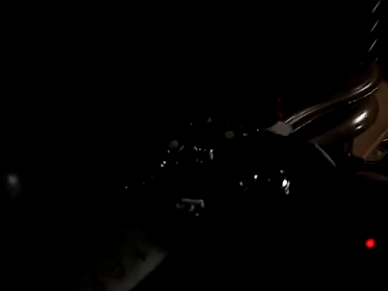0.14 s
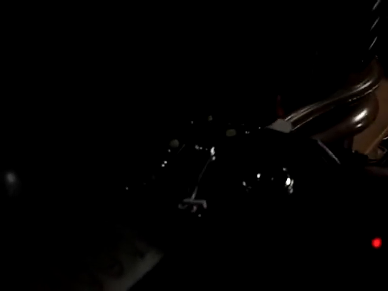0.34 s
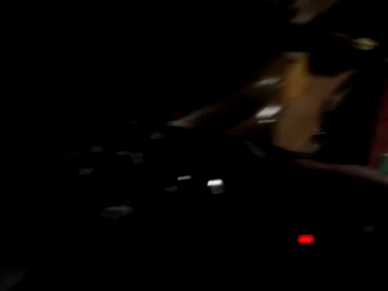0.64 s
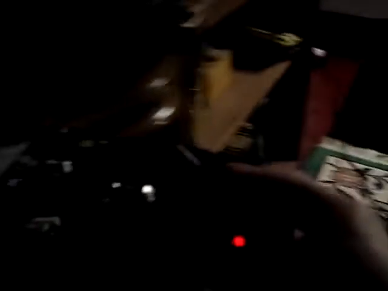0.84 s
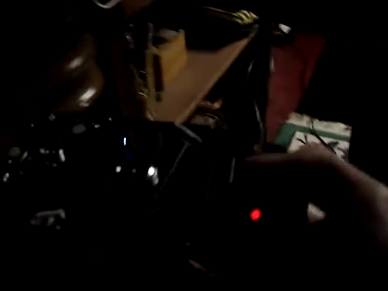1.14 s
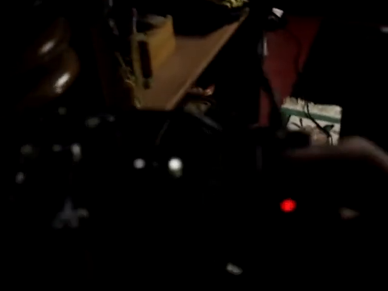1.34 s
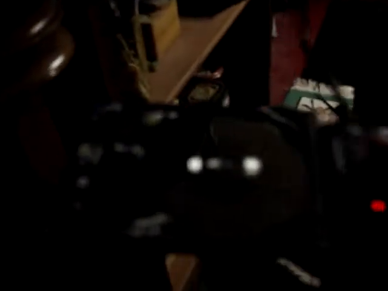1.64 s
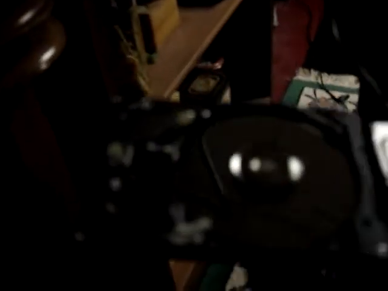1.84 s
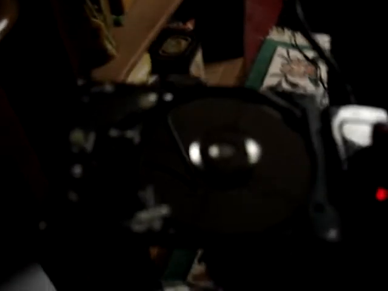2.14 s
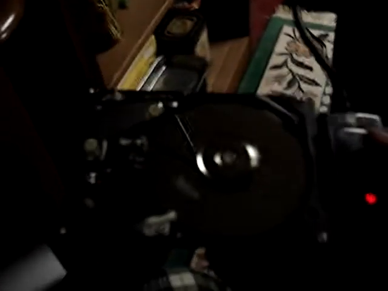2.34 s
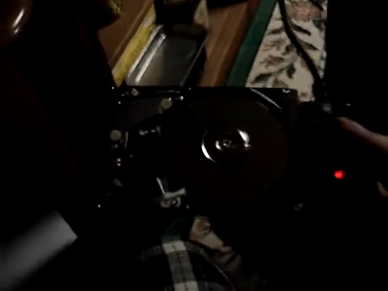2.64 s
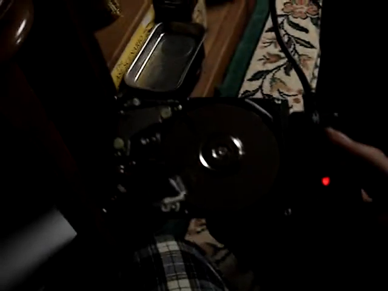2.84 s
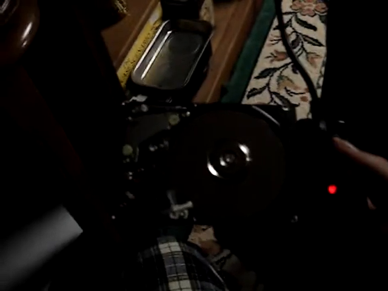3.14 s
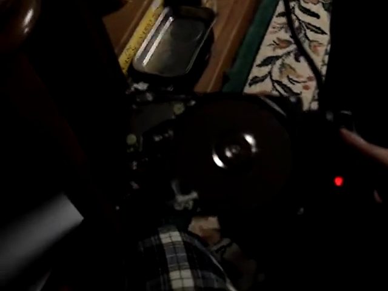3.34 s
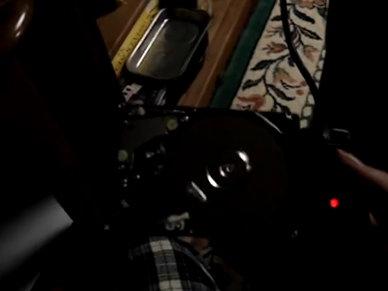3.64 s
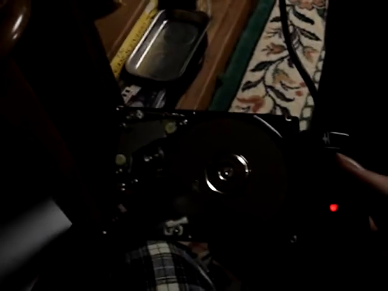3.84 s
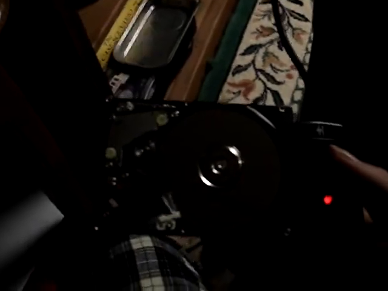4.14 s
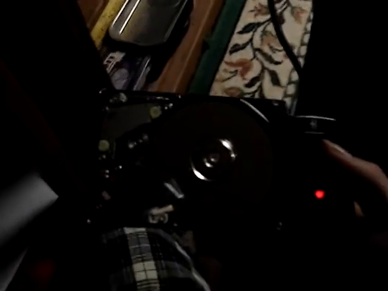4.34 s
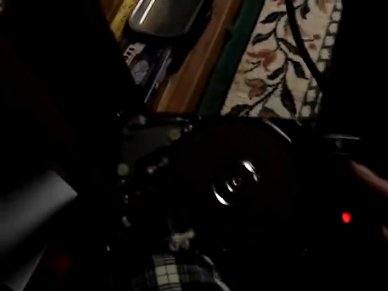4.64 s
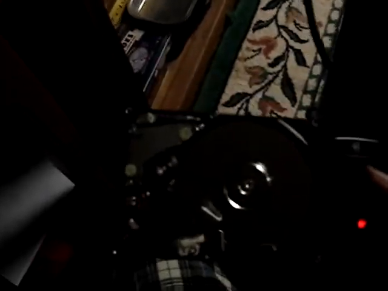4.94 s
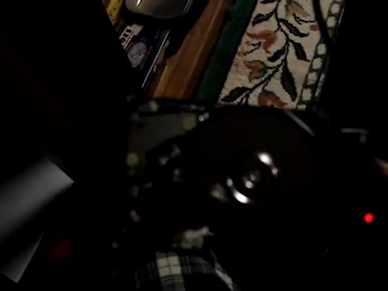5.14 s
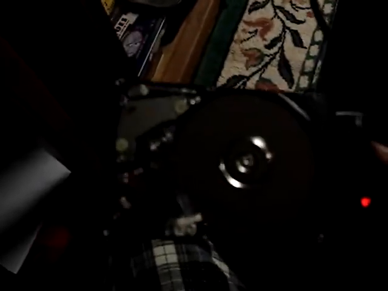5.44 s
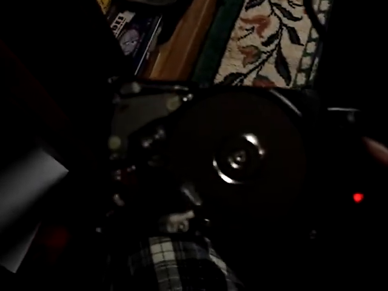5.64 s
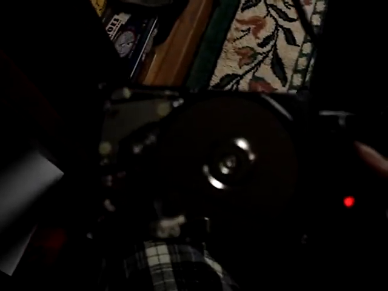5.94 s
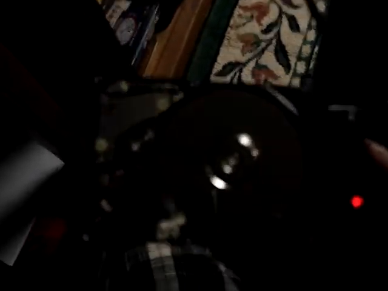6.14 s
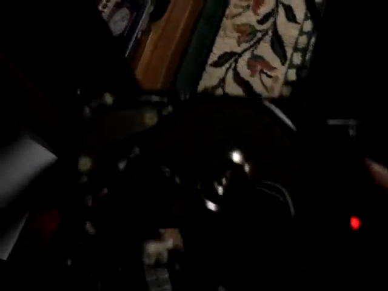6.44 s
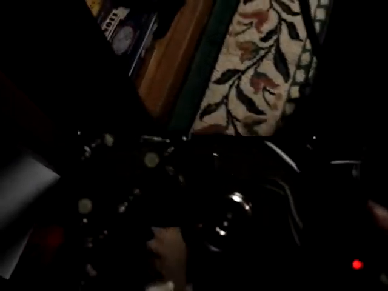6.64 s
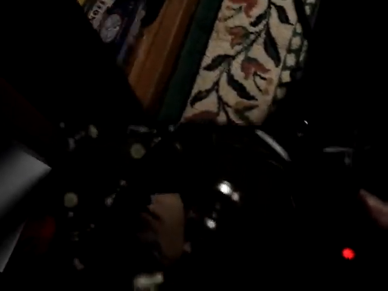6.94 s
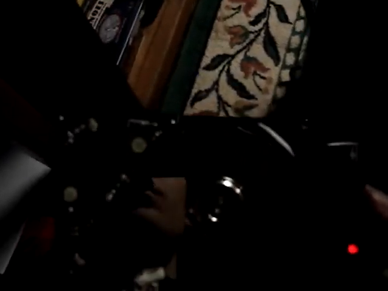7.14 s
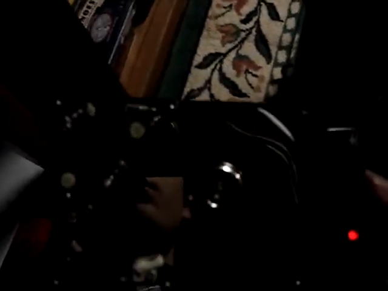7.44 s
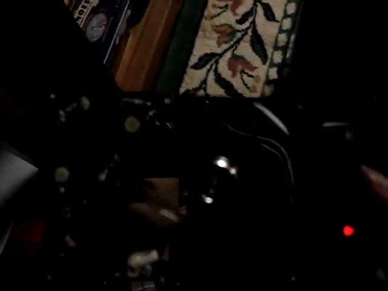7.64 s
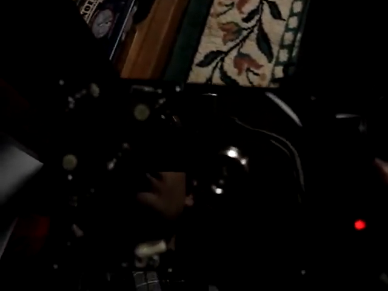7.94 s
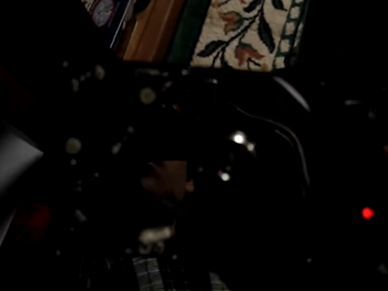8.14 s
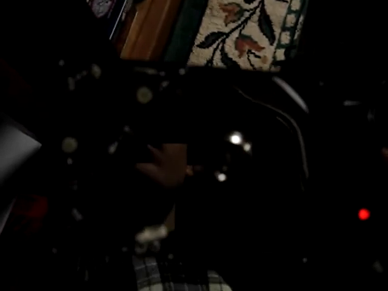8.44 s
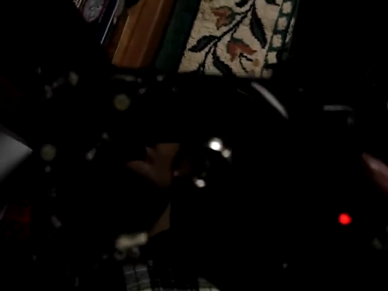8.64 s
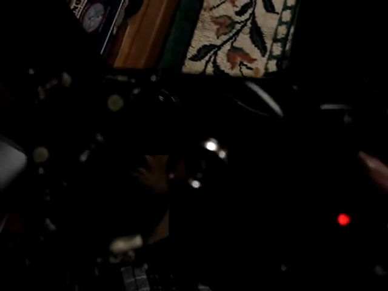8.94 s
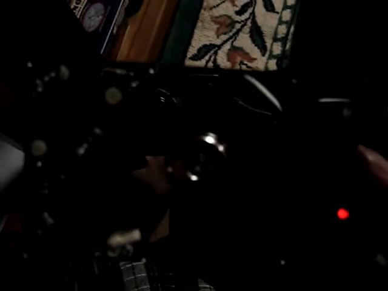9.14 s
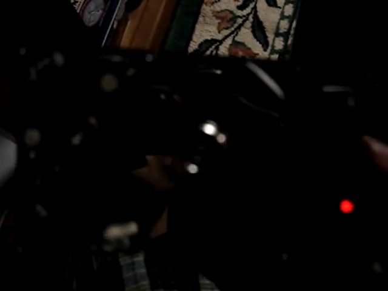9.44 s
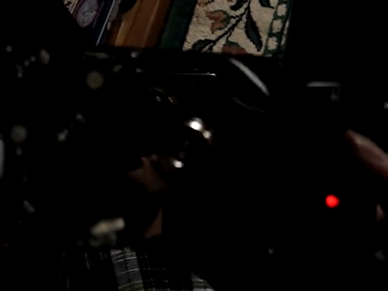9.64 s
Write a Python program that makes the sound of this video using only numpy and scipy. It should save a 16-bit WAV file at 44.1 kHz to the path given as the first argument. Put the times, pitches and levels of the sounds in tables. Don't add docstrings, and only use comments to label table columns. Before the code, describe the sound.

Soft steady air rush and thin motor whine from a spinning disk, very near and dry. Over it runs a regular failing cycle: crisp latch click, two lighter ticks, a short buzzing rattle, rasp or few sharp ticks, then a loud hard metallic clack and rebound. Seven slams occur, and the last cycle is cut off after its opening ticks. A few dull handling knocks, slightly overloaded small-microphone sound.

```python
import sys
import numpy as np
from scipy import signal
from scipy.fft import rfft, irfft, next_fast_len
from scipy.io import wavfile
from scipy.ndimage import uniform_filter1d, minimum_filter1d, map_coordinates

SR = 44100
rng = np.random.default_rng(int(sys.argv[2]) if len(sys.argv) > 2 else 0)


def store_pcm(level_fs):
    pcm = np.round(np.clip(level_fs, -1, 1) * 32767).astype(np.int16)
    wavfile.write(sys.argv[1], SR, np.atleast_2d(pcm).T)


def invert_db(level):
    return 10 ** (np.asarray(level, dtype=float) / 20)


N = 431298


def unit(x):
    return x / np.sqrt(np.mean(x ** 2) + 1e-20)


def wobble(rate):
    knots = rng.standard_normal(int(N * rate / SR) + 4)
    return unit(map_coordinates(knots, [np.arange(N) * rate / SR]))


def filtered(x, response):
    m = next_fast_len(N + 8192)
    return irfft(rfft(x, m) * response(np.fft.rfftfreq(m, 1 / SR)), m)[:N]


def ringing(x, modes):
    def response(f):
        total = 0
        for k, (centre, width, db) in enumerate(modes):
            damping = 1j * f * width
            total = total + (-1) ** k * invert_db(db) * damping / (centre * centre - f * f + damping)
        return total / np.sqrt(np.mean(np.abs(total) ** 2))
    return filtered(x, response)


def grit(spiky_db):
    x = rng.standard_normal(N) * invert_db(spiky_db * wobble(1500))
    return x / np.sqrt(np.abs(uniform_filter1d(x ** 2, size=120)) + 1e-9)


# time after the slam in seconds, speed change in percent.
SAG = [(-.42, 0), (-.33, -.3), (-.2, .1), (-.14, .5), (-.03, .1), (.3, 0), (.38, -.33), (.5, -.05), (.7, 0)]


def turns():
    t, peaks = np.arange(N) / SR, np.transpose(SLAMS)[0]
    change = sum(np.interp(t - s, *np.transpose(SAG)) for s in peaks)
    return np.cumsum(1 + change / 100) / SR


DUCKS_DB = [5, 5.7, 6.04, 4.8, 4.46, 4.8, 5.5, 6]
DUCK_S, RECOVER_DB_PER_S, EARLIER_SLAM_S = 0.054, 4.5, -.75


def gain_db():
    t, slams = np.arange(N) / SR, [EARLIER_SLAM_S] + [row[0] for row in SLAMS]
    ducks = []
    for s, db in zip(slams, DUCKS_DB):
        ducks.append(np.interp(t - s, [0, DUCK_S, DUCK_S + db / RECOVER_DB_PER_S], [0, db, 0]))
    return -np.max(ducks, axis=0)


# frequency in Hz, density in dB per Hz.
AIR = [(20, -69.5), (45, -17.5), (135, -15), (160, -8.5), (300, -5), (480, -6.5), (650, -5), (1000, -4),
       (1500, -10), (1900, -12), (2700, -14), (3300, -19), (5000, -21.5), (7000, -23), (10100, -23.5)]
# multiple of the spindle's rate, level in dB below the rush.
ORDER_LEVELS = [(5, -26.5), (6, -55.5), (8, -55), (9, -12), (10, -19), (11, -41.5), (12, -25), (13, -20)]
# frequency in Hz, level in dB below the rush.
WHINES = [(30, -20), (2527, -29), (4990, -39), (5055, -31.5), (5125, -30), (7583, -22), (7876, -51.5)]
# frequency in Hz, width in Hz, level in dB below the rush.
HUMS = [(173, 48, -17), (283, 7.3, -33), (648, 21, -12.5), (947, 7.3, -13)]
SPINDLE_HZ, RUSH_DB = 125.35, -41.5


def spindle():
    f, level = np.transpose(AIR)
    colour = lambda hz: invert_db(np.interp(np.log(hz + 1), np.log(f), level))
    rush = unit(filtered(rng.standard_normal(N), colour)) * invert_db(.7 * wobble(8))
    shaft = turns()
    lines = [(k * SPINDLE_HZ, db) for k, db in ORDER_LEVELS] + WHINES
    tones = 0
    for hz, db in lines:
        level = invert_db(db + 5.0 + 1.4 * wobble(4.0))
        tones = tones + level * np.sin(2 * np.pi * hz * shaft + 0.36 * wobble(4))
    hums = sum(invert_db(db) * unit(ringing(rng.standard_normal(N), [(hz, w, 0)])) for hz, w, db in HUMS)
    return invert_db(RUSH_DB + gain_db() - 3.5) * (rush + tones + hums)


# start in seconds, level in dB, pitch in Hz, time to fall 60 dB in seconds.
KNOCKS = [
    (1.894, -36.5, 1330, 0.13),
    (1.897, -41, 770, 0.09),
    (4.657, -32, 488, 0.027),
    (4.657, -45.5, 1450, 0.15),
    (4.66, -38.5, 1000, 0.18),
    (4.669, -37.5, 444, 0.19),
]


def knocks():
    out, t = np.zeros(N + SR), np.arange(SR // 8) / SR
    for s, db, hz, t60 in KNOCKS:
        body = signal.iirpeak(hz, 1.9, SR)
        blow = rng.standard_normal(len(t)) + 25 * (t == 0)
        ring = signal.lfilter(*body, signal.lfilter(*body, blow))
        out[round(s * SR):][:len(t)] += invert_db(db - 60 * t / t60) * unit(ring)
    return out[:N]


RING_HZ, RING_T60_S = 4700, 0.15
RING_LEAD_DB, RING_SLAM_DB = -9, -22


def flexure():
    out, t = np.zeros(N + SR), np.arange(SR // 8) / SR
    ring = np.sin(2 * np.pi * RING_HZ * t) * invert_db(-60 * t / RING_T60_S) * (1 - np.exp(-t / .002))
    hits = [(s - lead, db + RING_LEAD_DB) for s, _, lead, db, _ in LATCHES]
    hits += [(s + REBOUND_S + SETTLE_S, db + RING_SLAM_DB) for s, *_, db in SLAMS]
    for s, db in hits:
        out[round(s * SR):][:len(t)] += invert_db(db + rng.normal(0, 2)) * ring
    return out[:N] * invert_db(3.1 * wobble(60))


# start and end in seconds, level at start and at end in dB, brightness in dB.
SCRAPES = [
    (2.49, 2.52, -61, -60, 10.5),
    (4.981, 5.064, -45, -36.5, -6.5),
    (7.543, 7.629, -46, -37, -1.5),
    (8.765, 8.852, -37, -40, -5),
]
# frequency in Hz, width in Hz, level in dB.
SLIDER = [(5060, 640, -2), (5550, 170, -3.5), (5940, 150, -3.5), (6580, 430, -0.7)]
SLIDER_TOP = [(8000, 450, 0), (8900, 600, 0), (9550, 400, -1)]
SCRAPE_EDGE_S, SCRAPE_EDGE_DB = 0.003, -93


def scrapes():
    t, force = np.arange(N) / SR, np.zeros((2, N))
    for start, end, start_db, end_db, bright_db in SCRAPES:
        s = [start - SCRAPE_EDGE_S, start, end, end + SCRAPE_EDGE_S]
        levels = [SCRAPE_EDGE_DB, start_db, end_db, SCRAPE_EDGE_DB]
        level = np.interp(t, s, levels, left=-120, right=-120)
        force += invert_db([level, level + bright_db])
    rasp, shrill = force * grit(spiky_db=2.2)
    slider = ringing(rasp, SLIDER) + ringing(shrill, SLIDER_TOP)
    return slider + invert_db(-9) * ringing(rasp, BEAM) + invert_db(-18) * ringing(rasp, PIVOT)


# first, strongest and last bump in seconds.
RATTLES = [
    (.797, .8035, .813),
    (.869, .905, .914),
    (1.0, 1.0355, 1.051),
    (2.331, 2.3496, 2.3784),
    (3.618, 3.665, 3.697),
]
# strongest, first and last bump in dB, pivot and beam in dB
RATTLE_LEVELS = [
    (-28, -32, -42, -6.5, 8),
    (-31, -34, -27, -2, 6),
    (-23, -34, -32, -4.5, 6.5),
    (-24, -27, -31.5, -7.5, 1.5),
    (-29.5, -33, -32, -6.5, -2.5),
]
BUMP_CASE_DB, BUMP_MS, BUMP_SCATTER_DB, BUMP_JITTER_S = -23, 3.15, 2, .0012


def rattle_bumps():
    rows = []
    for (first, peak, last), levels in zip(RATTLES, RATTLE_LEVELS):
        db, first_db, last_db, pivot_db, beam_db = levels
        before = np.linspace(first, peak, round((peak - first) * SPINDLE_HZ), endpoint=False)
        after = np.linspace(peak, last, round((last - peak) * SPINDLE_HZ) + 1)
        s = np.r_[before, after]
        jitter, scatter = rng.standard_normal((2, len(s)))
        level = np.interp(s, [first, peak, last], [first_db, db, last_db]) + BUMP_SCATTER_DB * scatter
        for bump_s, bump_db in zip(s + BUMP_JITTER_S * jitter, level):
            rows.append((bump_s, bump_db, BUMP_CASE_DB, pivot_db, beam_db, BUMP_MS))
    return rows


# time in seconds, level in dB, case and pivot in dB relative to it, length in ms.
TICKS = [(0.5698, -46, 17, -18, 1.2), (0.987, -41.5, -7, -4, 6.2), (1.115, -35.5, 1, -6, 4.1),
         (1.7039, -46.5, 12.5, 3, 1.4), (2.237, -52.5, 20.5, 14, 2.2), (2.32, -23.5, -27, -13, 1.1),
         (2.4388, -40.5, -2, 0, 1.9), (3.7372, -39.5, -8, -8.5, 2.4), (5.098, -34.5, -13, -12, 1.3),
         (6.3, -39, -15, -8, 4.1), (6.3152, -35, -9, -13, 1.6), (6.3237, -28.5, -19, -22, 4.5),
         (6.337, -46, -3.5, -17, 1.9), (6.351, -24, -27, -8, 2.5), (6.413, -34, -4, -9, 2.6),
         (7.6573, -28.5, -7, -14, 2.2), (7.698, -28, -11, -14, 1.6), (8.8795, -25, -9, -5, 1.5),
         (8.9189, -28.5, -10, -13, 1.3)]
# time in seconds, level in dB, how many seconds earlier the lead-in
# tick comes, its level in dB, how many seconds earlier the weak treble starts to drop out.
LATCHES = [
    (0.3335, -26.5, .0125, -27, .043),
    (1.859, -28, 0.012, -29, .005),
    (3.1718, -32.5, 0.012, -27.5, .038),
    (4.4705, -33.5, 0.021, -35.5, .038),
    (5.8254, -33.5, 0.02, -33.5, .005),
    (7.0666, -31.5, 0.0256, -35, .043),
    (8.2991, -29, 0.015, -30, .035),
    (9.5238, -31, 0.017, -32, .05),
]
# time in seconds, step out and step in in dB, middle of the treble
# dropout in seconds after each step.
STEPS = [
    (0.4329, -33, -36, -.017, 0.021),
    (1.9589, -31, -35.5, .012, 0.0016),
    (3.2696, -37, -37.5, -.014, 0.0014),
    (4.5657, -35, -38.5, -.013, -0.016),
    (5.9198, -34.5, -37, .006, -0.00074),
    (7.1588, -31, -36, -.008, -0.021),
    (8.3978, -32.5, -36.5, .015, .006),
    (9.6218, -31.5, -36, .015, 0.0016),
]
# case, pivot and beam in dB relative to the blow, length in ms.
LEAD, LATCH = (-4, -18, -15.5, 3), (3, -15.5, -3, 3.8)
STEP_OUT, STEP_IN = (-18, -15.5, -2.5, 1.5), (-2, -5, -6.5, 2)
CLEAR, CLEAR_S, CLEAR_DB = (-4.5, -11, -13, 4), .011, -10.5
TICK_BEAM_DB, STEP_GAP_S = -1.5, .0788


def seek_ticks():
    rows = [(s, db, case_db, pivot_db, TICK_BEAM_DB, ms) for s, db, case_db, pivot_db, ms in TICKS]
    for s, db, lead, lead_db, _ in LATCHES:
        rows += [(s - lead, lead_db, *LEAD), (s, db, *LATCH), (s + CLEAR_S, db + CLEAR_DB, *CLEAR)]
    for s, out_db, in_db, *_ in STEPS:
        rows += [(s, out_db, *STEP_OUT), (s + STEP_GAP_S, in_db, *STEP_IN)]
    return rows


# peak in seconds, strike, beam swing, rebound and settling in dB.
SLAMS = [
    (1.2801, -18.5, -26, -19, -21.5),
    (2.5906, -19, -29.5, -19, -21.5),
    (3.8874, -19, -30.5, -18.5, -22.5),
    (5.2402, -18.5, -34, -17.5, -20.5),
    (6.48, -18.5, -28.5, -18, -20),
    (7.7178, -18.5, -27.5, -18.5, -20.5),
    (8.943, -18.5, -28.5, -19, -20.5),
]
# case, pivot and beam in dB relative to the blow, length in ms.
GRAZE, SCUFF = (-5, 7.5, -11, 1), (3, -16, -8, 2)
STRIKE, SWING, SHUDDER = (-8, -15.5, -9.5, 3.5), (-3, -17, 8.5, 5), (13.5, -3, -4, 2)
REBOUND, SETTLE, REST = (-3, -18, -3, 3), (-1.5, -23, -8.5, 4), (-2, -9.5, -6.5, 3.5)
GRAZE_S, GRAZE_DB, SWING_S, SHUDDER_S, SHUDDER_DB = -0.011, -29, 0.0055, .021, -25.5
REBOUND_S, SCUFF_S, SCUFF_DB = .0443, -0.0062, -10
SETTLE_S, REST_S, REST_DB = 0.0158, .007, -7.5


def slam_blows():
    rows = []
    for s, db, swing_db, rebound_db, settle_db in SLAMS:
        back = s + REBOUND_S
        rows += [(s + GRAZE_S, db + GRAZE_DB, *GRAZE),
                 (s, db, *STRIKE),
                 (s + SWING_S, swing_db, *SWING),
                 (s + SHUDDER_S, db + SHUDDER_DB, *SHUDDER),
                 (back + SCUFF_S, rebound_db + SCUFF_DB, *SCUFF),
                 (back, rebound_db, *REBOUND),
                 (back + SETTLE_S, settle_db, *SETTLE),
                 (back + SETTLE_S + REST_S, settle_db + REST_DB, *REST)]
    return rows


# frequency in Hz, width in Hz, level in dB.
CASE = [(1833, 59, 1.5), (1974, 204, -8.5), (2410, 59, 4.5), (2960, 500, -16.5), (4650, 25, -10)]
PIVOT = [(2660, 66, 8.6), (2947, 45, 2.5)]
BEAM = [(3639, 87, -1.5), (3827, 150, -7)]
ARM = [(4220, 173, 0), (4553, 120, 3), (4835, 110, 4.5), (5230, 160, -0.5), (5630, 390, -1.5),
       (6090, 170, -1.5), (6540, 310, -4.5)]
HEAD = [(7560, 450, -0.5), (8750, 180, -10), (9210, 340, -10.5), (10150, 880, -14.5)]
STOP_TOP = [(7770, 140, -2.7), (9190, 650, 0), (10080, 420, -0.5)]


def contacts(rows, top_modes, rise, lead_s, head_db, bright):
    force, t = np.zeros((5, N + SR)), np.arange(-SR // 100, SR // 20) / SR
    fade_db = np.array([[9], [8], [8], [7.5], [10.5]])
    for s, db, case_db, pivot_db, beam_db, ms in rows:
        u = t / (ms / 1000)
        chatter = np.where(u < 0, invert_db(9 * u / rise), invert_db(-fade_db * np.abs(u)))
        levels = [case_db - 0.5, pivot_db + 3, beam_db - 0.5, 1.5, head_db + bright * pivot_db]
        start = round((s - lead_s) * SR) - SR // 100
        force[:, start:][:, :len(t)] += invert_db(db + np.array(levels))[:, None] * chatter
    impacts = force[:, :N] * grit(spiky_db=4.5)
    return sum(ringing(part, modes) for part, modes in zip(impacts, (CASE, PIVOT, BEAM, ARM, top_modes)))


def scene():
    rise = .36
    slams = contacts(slam_blows(), STOP_TOP, rise, lead_s=0.0015, head_db=-5.0, bright=0.22)
    ticks = contacts(seek_ticks() + rattle_bumps(), HEAD, rise, lead_s=0.00092, head_db=0.5, bright=0.5)
    return (slams + ticks + scrapes() + flexure() + knocks() + spindle())[None]


# start in seconds, offset in dB.
SHOVES = [
    (1.021, -43),
    (1.278, -26.5),
    (2.346, -39.5),
    (2.593, -34.5),
    (3.885, -32),
    (5.237, -33.5),
    (6.478, -32.5),
    (7.722, -35),
    (8.945, -36),
]
ECHO_SHOVE_S, ECHO_SHOVE_DB = 0.027, -13


def shoves():
    out, t = np.zeros(N + SR), np.arange(SR // 4) / SR
    jump = 1 - np.exp(-t / 0.002)
    for s, db in SHOVES + [(s + ECHO_SHOVE_S, db + ECHO_SHOVE_DB) for s, db in SHOVES]:
        out[round(s * SR):][:len(t)] += invert_db(db + 2.5) * jump * np.exp(-t / 0.024)
    return out[:N]


THIN_SLAM, THIN_END, THIN_TICK = (-.028, .095), (0, .034), (-.028, .034)
LOUD_TICK_DB, THIN_STEP_S, LATCH_AFTER = -39.5, .031, .65


def thinned_spans():
    spans = [np.add(row[0], THIN_SLAM) for row in SLAMS]
    spans += [(s - early, s + LATCH_AFTER * early) for s, *_, early in LATCHES]
    ends = [row[2] for row in RATTLES] + [row[1] for row in SCRAPES[1:]]
    spans += [np.add(s, THIN_END) for s in ends]
    spans += [np.add(row[0], THIN_TICK) for row in TICKS if row[1] > LOUD_TICK_DB]
    middles = [s + m for s, _, _, out_s, in_s in STEPS for m in (out_s, STEP_GAP_S + in_s)]
    return spans + [(m - THIN_STEP_S / 2, m + THIN_STEP_S / 2) for m in middles]


def thin_treble(x, depth_db, floor_db, plenty_db, edge_hz, scatter_db):
    hz, t, z = signal.stft(x, SR, nperseg=384)
    cells = (np.abs(z[:192]) ** 2).reshape(32, 6, -1).sum(axis=1) ** .5
    cell_hz = hz[:192].reshape(32, 6).mean(axis=1)[:, None]
    treble = np.linalg.norm(cells * (cell_hz > edge_hz), axis=0)
    loudest = -minimum_filter1d(-treble, size=9)
    thinned = sum((t >= a) & (t <= b) for a, b in thinned_spans()) > 0
    need = np.maximum(loudest * invert_db(-depth_db), invert_db(floor_db - np.where(thinned, 0, plenty_db)))
    luck = np.repeat(rng.standard_normal((32, len(t) // 3 + 1)), 3, axis=1)[:, :len(t)]
    spared_db = 30 * np.clip(1.3 - cell_hz / edge_hz, 0, 1)
    z[:192] *= np.repeat(cells > need * invert_db(scatter_db * luck - spared_db), 6, axis=0)
    return signal.istft(z, SR, nperseg=384)[1][:N]


def band_limit(x):
    return signal.sosfilt(signal.butter(12, 11300, fs=SR, output="sos"), x)


def record(dry):
    x = dry[0] / (1 + np.abs(dry[0] / .31) ** 3) ** (1 / 3) + shoves()
    x = thin_treble(x, depth_db=33, floor_db=-61, plenty_db=20, edge_hz=3700, scatter_db=4.5)
    x = filtered(x, lambda hz: 1 / (1 + (hz / 10020) ** 150))
    return band_limit(x[None])


dry = scene()
out = record(dry)
store_pcm(out)
```